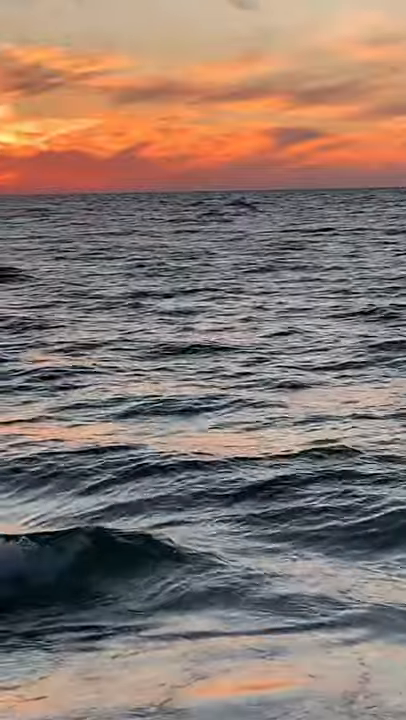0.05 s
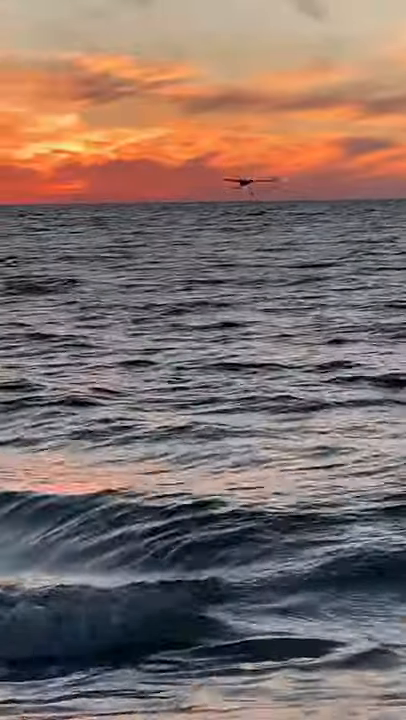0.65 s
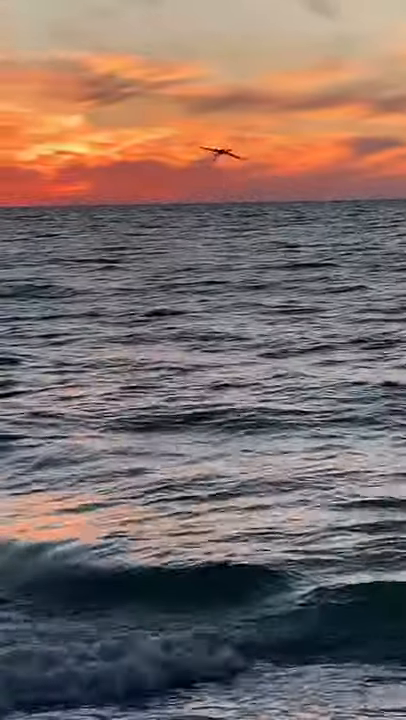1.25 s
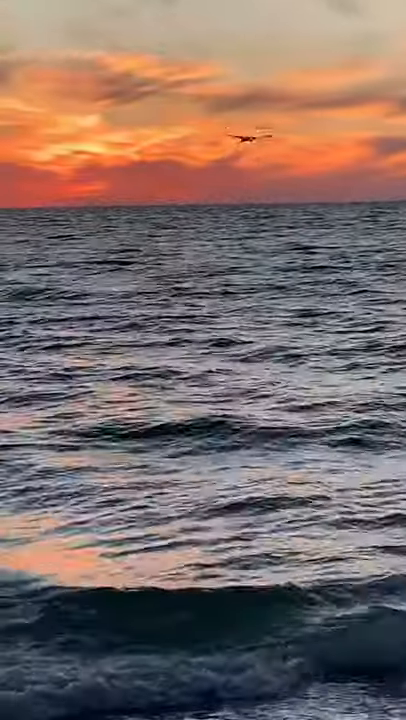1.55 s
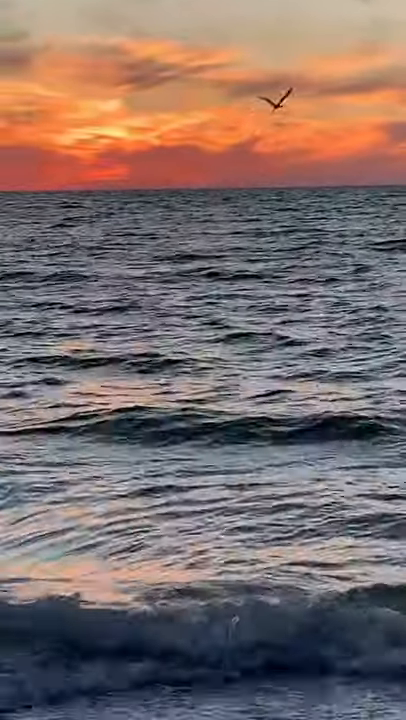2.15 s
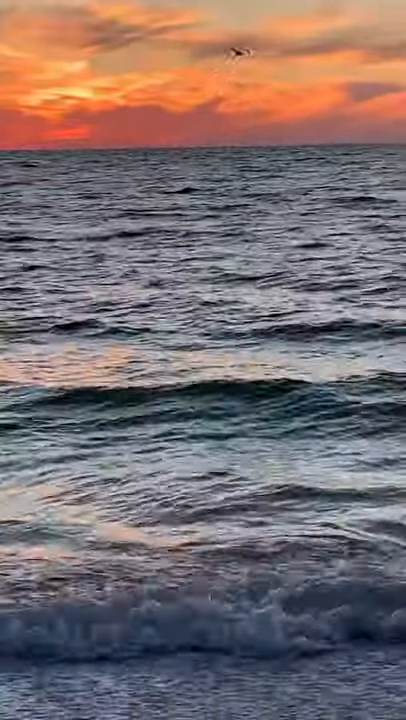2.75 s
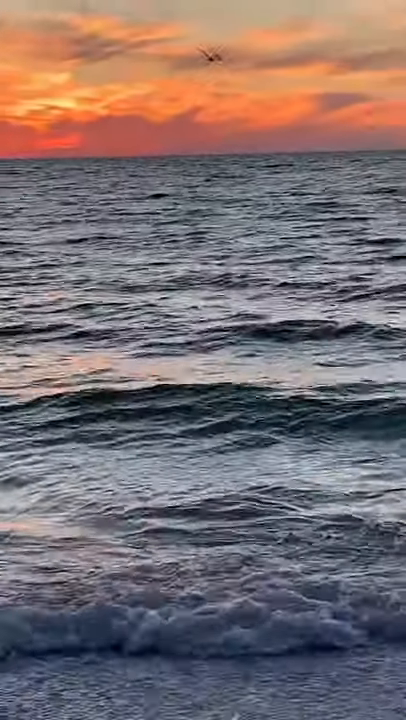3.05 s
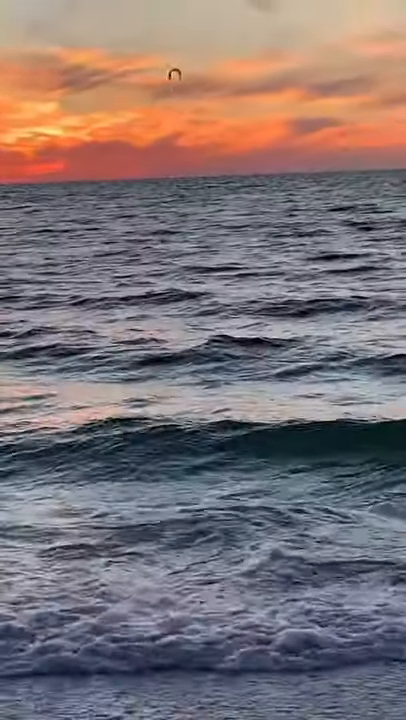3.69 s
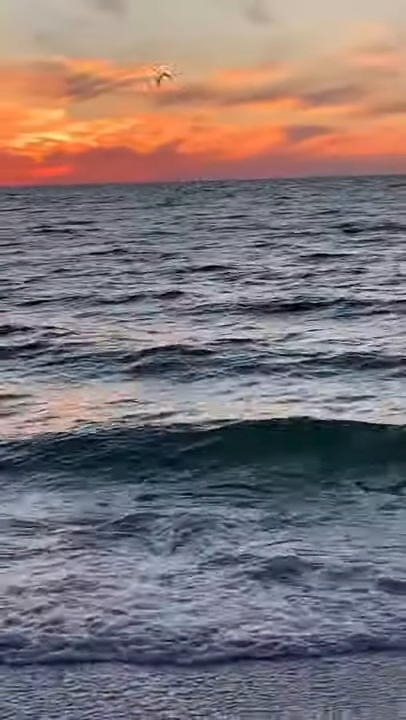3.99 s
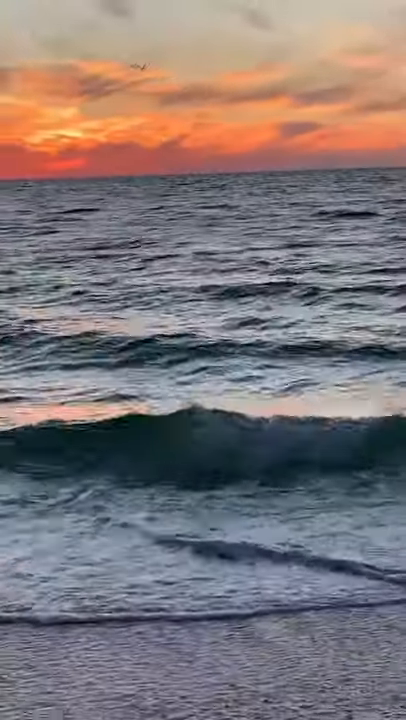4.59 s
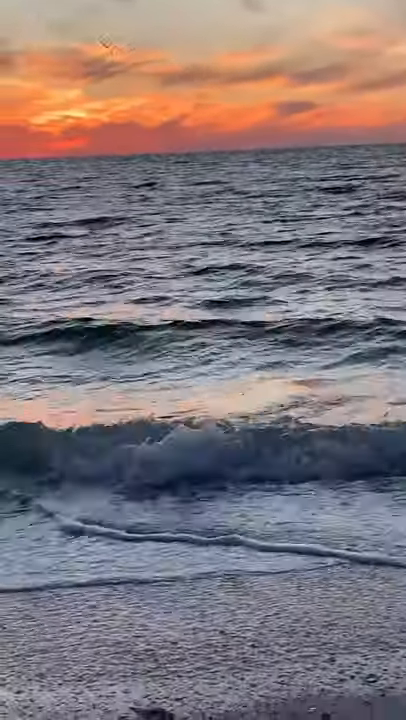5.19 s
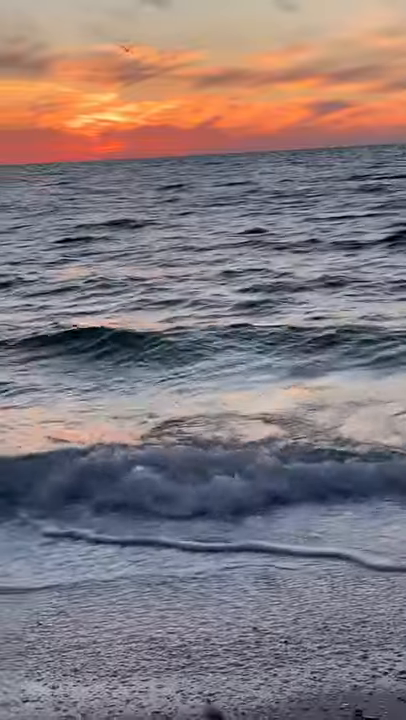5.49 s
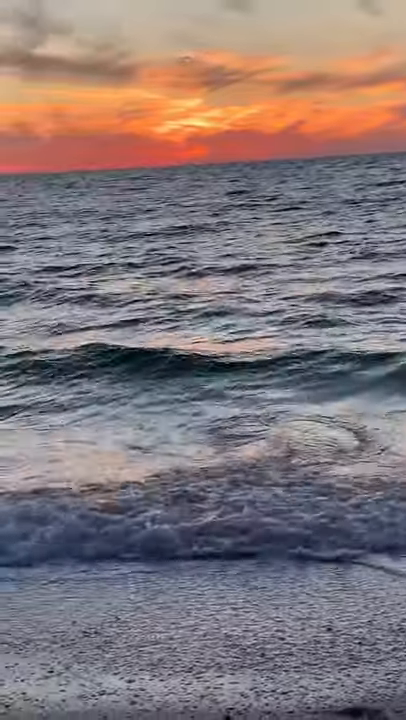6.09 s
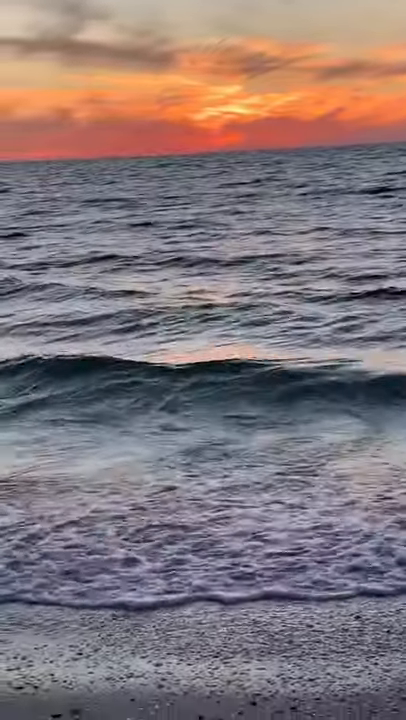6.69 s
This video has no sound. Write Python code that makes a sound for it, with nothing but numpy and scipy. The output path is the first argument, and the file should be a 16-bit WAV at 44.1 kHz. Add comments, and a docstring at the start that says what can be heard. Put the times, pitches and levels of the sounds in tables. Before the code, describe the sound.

Small waves break on a sandy beach, ahead and slightly to the left. Each one churns and roars as it spills, then its foam hisses up the sand. Close on the microphone, gusty wind rumbles and flutters throughout, with short puffs and low thumps. The surf swells twice, early and again near the end, while the wind is most blustery in the middle.

```python
"""Small surf on a windy beach

A hand-held camera on the sand, the sea ahead and to the left. Small waves break: each churns and
roars as it spills, then its foam hisses up the beach. Right at the two microphone ports, gusty wind
rumbles and flutters, with short brighter puffs, single thumps and wide cross gusts.
The bass is mono, up to a pitch that drifts."""
import sys
import numpy as np
from scipy import signal
from scipy.fft import rfft, irfft, next_fast_len
from scipy.io import wavfile
from scipy.ndimage import uniform_filter1d, map_coordinates

SR = 44100
rng = np.random.default_rng(int(sys.argv[2]) if len(sys.argv) > 2 else 0)


def put_to_file(sound):
    """Save the sound as 16-bit audio at rate SR, in the file named by the first command-line argument."""
    columns = np.atleast_2d(sound).T  # one column per channel
    safe = np.clip(columns, -1, 1)
    whole_steps = np.round(safe * 32767)
    wavfile.write(sys.argv[1], SR, whole_steps.astype(np.int16))


N = 301644

# The surf builds to two breakers and ebbs. Each row: time in seconds, roar in dB, relative spray in dB.
SURF_LEVELS = [(0, -37.5, -43), (.48, -40, -42.5), (.85, -39, -43), (1.25, -36.5, -42), (1.6, -32.5, -45),
               (2.1, -37, -39), (2.65, -39, -43.5), (3.25, -40.5, -49), (3.9, -37.5, -48), (4.12, -38, -47),
               (4.28, -40, -46), (4.6, -38, -47.5), (5.1, -37.5, -44.5), (5.33, -34.3, -44),
               (5.75, -36.5, -46), (6.1, -38, -56), (6.55, -42.5, -56), (6.84, -39.5, -54)]
# White water tumbling under the crest. Each row: time in seconds, level in dB.
TUMBLE_LEVELS = [(0, -36.5), (.4, -41.5), (.9, -33), (1.6, -30), (2.1, -32), (2.55, -36), (2.7, -39.5),
                 (2.85, -34), (3.3, -35.5), (3.8, -34.5), (4.0, -29.5), (4.8, -36), (5.1, -36.5),
                 (5.3, -34), (5.8, -32.5), (6.84, -51)]
# Sheets of foam spilling. Each row: start, length and rise in seconds, level in dB.
FOAM_SPILLS = [(-.1, 0.21, 0.15, -40.5), (0.575, 0.33, 0.15, -37), (1.023, 0.49, 0.15, -38),
               (1.416, 0.45, 0.094, -37), (1.847, 0.24, 0.16, -40.5), (2.797, 0.082, 0.07, -37.5),
               (3.52, 0.46, 0.16, -39), (4.02, 0.13, .06, -39), (5.09, 0.23, 0.18, -40),
               (5.41, 0.32, 0.095, -42.5), (6.293, 0.17, 0.099, -42.5)]
# Notes of air trapped by the breakers. Each row: start and length in seconds, pitch in Hz, level in dB.
HOLLOW_NOTES = [(-.3, 2.75, 827, -41), (-.3, 3, 1395, -44.5), (4.994, 0.8, 1160, -44)]
# The colours of the sea. Each row: frequency in Hz, relative density in dB.
CHURN_SPECTRUM = [(40, -35), (150, -5), (270, 0.5), (420, -2.5), (640, 2), (830, -3), (1000, -18.5),
                  (1500, -16.5), (3000, -44)]
ROAR_SPECTRUM = [(200, -48), (450, -22), (620, -7), (830, -4.5), (990, -3), (1200, 0), (1380, -3.5),
                 (1650, -5.5), (2050, -8.5), (2600, -14), (3800, -12), (9000, -56)]
FOAM_SPECTRUM = [(900, -3.5), (2000, 2.5), (2900, -1.5), (4500, -.5), (6300, .5), (7600, -2), (9000, -4),
                 (12000, -9), (15800, -17)]
SPRAY_SPECTRUM = [(3000, -19), (6000, -5), (8700, -1), (11000, -0.5), (13000, -4.5), (15800, -5)]
# How alike the sea is at the two ports. Each row: frequency in Hz, likeness (clipped to 0-0.995 in use).
SEA_LIKENESS = [(420, 0.5), (650, 0), (850, 0.5), (1000, 0.63), (1400, 0.7), (1850, 0.5), (2200, 0),
                (2750, 1), (3200, -5.5), (3900, 16)]
# The sea reaches the left port first. Each row: frequency in Hz, lead in radians.
LEFT_LEAD = [(250, 0), (340, 1.4), (420, 3), (520, 3.7), (680, 4.3), (830, 5.8), (1020, 5.4), (1250, 6.2),
             (1500, 6.3), (2000, 7.3), (2450, 9.1), (2900, 7.8), (3600, 8), (4650, 9.42), (6850, 12.57),
             (15200, 25.13)]
# The sea's balance between the ports. Each row: frequency in Hz, left minus right in dB.
SEA_BALANCE = [(300, -9), (700, -0.5), (1400, -0.5), (2000, -2.5), (3000, -0.5), (4500, 0)]

# The breeze between gusts. Each row: time in seconds, level in dB.
BREEZE_LEVELS = [(0, -37.5), (.3, -27), (.48, -30.5), (1.1, -27), (1.55, -29.5), (2.1, -27), (2.5, -30),
                 (2.75, -35), (2.95, -30), (3.8, -28), (4.1, -25), (4.65, -25), (5.03, -30.5), (5.5, -28.5),
                 (6.1, -30.5), (6.84, -30.5)]
# Gusts on the microphone. Each row: start and length in seconds, flutter in dB, rumble in dB.
WIND_GUSTS = [(0.084, 0.081, -23.5, -29), (0.266, 0.11, -30.5, -26), (0.637, 0.12, -25, -30),
              (0.87, 0.021, -27, -30), (0.943, 0.048, -25, -25), (1.13, 0.076, -27.5, -27),
              (1.311, 0.12, -20.5, -28), (1.64, 0.06, -16, -23), (1.862, 0.091, -18.5, -25),
              (1.99, 0.034, -24.5, -24), (2.096, 0.05, -29, -26), (2.269, 0.033, -45, -23),
              (2.505, 0.035, -27.5, -30), (2.796, 0.07, -29.5, -31), (2.835, 0.065, -21.5, -22),
              (2.91, 0.078, -31, -22), (3.008, 0.039, -19.5, -20), (3.098, 0.028, -19.5, -21),
              (3.146, 0.023, -28, -22), (3.243, 0.084, -26.5, -27), (3.34, 0.073, -26, -28),
              (3.466, 0.02, -28, -24), (3.59, 0.034, -19.5, -25), (3.65, 0.027, -37, -22),
              (3.684, 0.035, -23.5, -23), (3.855, 0.081, -22.5, -40), (4.017, 0.21, -24, -28),
              (4.244, 0.035, -27.5, -25), (4.305, .045, -22, -23), (4.378, 0.037, -22, -27),
              (4.5, 0.1, -31, -34), (4.718, 0.055, -33, -20), (4.843, 0.084, -24.5, -24.5),
              (5.174, 0.12, -26, -29), (5.35, 0.12, -25.5, -29), (5.489, 0.22, -25.5, -26),
              (5.806, 0.19, -26.5, -24.5), (6.191, 0.056, -20.5, -24), (6.281, 0.056, -19.5, -22),
              (6.401, 0.088, -23.5, -26), (6.513, 0.066, -19.5, -22), (6.594, 0.05, -23.5, -22),
              (6.754, 0.063, -23.5, -32)]
# Sharp puffs. Each row: time of the peak in seconds, relative level in dB, decay in seconds.
WIND_PUFFS = [(0.329, -12.5, 0.025), (1.367, -7, 0.015), (1.397, -8, 0.013), (1.69, -7.5, 0.009),
              (1.93, -23, .014), (2.303, -17, 0.0066), (2.87, -6, 0.011), (3.168, -11, 0.011),
              (3.621, -7, 0.011), (3.714, -9.5, 0.012), (4.05, -11, .01), (4.116, -10, 0.0081),
              (4.204, -10, .012), (4.42, -13, 0.011), (6.525, -18, .014), (6.627, -20, 0.008),
              (6.647, -10, 0.0082)]
# Single eddies striking both ports. Each row: time in seconds, envelope peak in dB, pitch in Hz.
EDDY_KNOCKS = [(.425, -18, 90), (.712, -14.5, 72), (.893, -12.5, 99), (1.149, -16.5, 78), (1.396, -13, 674),
               (1.693, -11, 700), (1.704, -17, 152), (1.826, -9, 82.6), (1.937, -11, 123),
               (2.115, -15.5, 68), (2.2, -18, 62), (2.303, -17, 780), (2.871, -14, 760), (2.886, -7, 170),
               (2.975, -12.5, 67.6), (3.127, -13, 126), (3.176, -11, 100), (3.367, -11, 121),
               (3.623, -13.5, 780), (3.648, -11, 72), (3.701, -15, 80), (4.119, -9.5, 165),
               (4.335, -10.5, 85), (4.405, -11, 133), (4.897, -10, 100), (5.201, -15, 68), (5.47, -15, 68),
               (6.249, -10, 78), (6.657, -12.5, 76)]
# Gusts across the ports. Each row: start and length in seconds, relative thump and tear levels in dB.
CROSS_GUSTS = [(2.85, 0.04, -18.5, -32), (2.897, 0.066, -17.5, -28), (3.008, 0.058, -17.5, -33),
               (3.11, .06, -30, -31), (3.246, 0.2, -29, -40), (3.628, .02, -14.5, -22),
               (3.658, 0.067, -20.5, -27), (3.88, 0.26, -30, -35), (4.184, 0.022, -26, -24),
               (4.246, 0.11, -27, -31), (4.402, 0.041, -26, -28), (4.503, 0.18, -28, -40)]
# The colours of the wind. Each row: frequency in Hz, relative density in dB.
RUMBLE_SPECTRUM = [(10, -40), (25, -30), (40, -6.5), (56, 0), (105, 1), (150, -3.5), (220, -15),
                   (400, -16.5), (900, -86)]
FLUTTER_SPECTRUM = [(50, -33), (120, -3), (180, 2.5), (260, 1.5), (350, -5), (480, -7.5), (700, -21),
                    (1100, -29.5), (2200, -50), (5000, -122)]
PUFF_SPECTRUM = [(50, 4), (150, 9), (300, 7.5), (600, 3.5), (1000, -3), (1600, -31), (3000, -45),
                 (6000, -74)]
THUMP_SPECTRUM = [(150, -21), (270, -5), (325, -2.5), (420, -12), (600, -24), (1500, -70)]
TEAR_SPECTRUM = [(250, -16), (450, 2), (650, -9), (950, -6), (1400, -18), (2200, -20), (5000, -70)]
# The camera's mono bass. Each row: time in seconds, frequency in Hz below which the channels merge.
MONO_BELOW = [(0, 806), (1.25, 790), (1.65, 496), (2.1, 423), (2.5, 290), (4.8, 284), (5.4, 424),
              (6.84, 450)]

TOP_HZ = 15800  # the camera's band limit


def amp(db):
    """Decibels to gain."""
    return 10 ** (np.asarray(db) / 20)


def unit(x):
    """x at rms 1."""
    return x / np.sqrt(np.mean(x ** 2) + 1e-20)


def along(points, hz):
    """(Hz, value) points read on a log axis."""
    f, v = np.transpose(points)
    return np.interp(np.log(hz + 1), np.log(f + 1), v)


def curves(rows):
    """One value per sample for each column after the time."""
    s, *cols = np.transpose(rows)
    return [np.interp(np.arange(N) / SR, s, c) for c in cols]


def wobble(rate):
    """A smooth random curve, rate knots a second."""
    return map_coordinates(rng.standard_normal(int(N * rate / SR) + 4), [np.arange(N) * rate / SR])


def swell(start, length, attack, release):
    """An envelope that rises smoothly and dies away once its length is over; times in seconds."""
    t = np.arange(N) / SR - start
    rise = np.sin(np.pi / 2 * np.clip(t / attack, 0, 1)) ** 2
    return rise * np.exp(-np.clip((t - length) / release, 0, 20))


def filtered(x, response):
    """x times a complex response of frequency."""
    m = next_fast_len(N + 8192)
    return irfft(rfft(x, m) * response(np.fft.rfftfreq(m, 1 / SR)), m)[..., :N]


def patchy(depth_db):
    """Two unrelated noises sharing patches of random gain in time and frequency."""
    noise = signal.stft(rng.standard_normal((2, N)), nperseg=512)[2]
    patches = uniform_filter1d(rng.standard_normal(noise.shape[1:]), size=5, axis=0)
    patches = uniform_filter1d(patches, size=12, axis=1)
    return signal.istft(noise * amp(depth_db * unit(patches)), nperseg=512)[1][:, :N]


def from_sea(pair, spectrum):
    """Colour two noises and place them wide, ahead and to the left of the microphone, at rms 1."""
    def blend(hz):
        angle = np.arccos(np.clip(along(SEA_LIKENESS, hz), 0, .995)) / 2
        return amp(along(spectrum, hz)) * [np.cos(angle), np.sin(angle)]

    def ports(hz):
        half = np.array([[.5], [-.5]])
        lead = np.interp(hz, *np.transpose(LEFT_LEAD))
        return amp(half * along(SEA_BALANCE, hz)) * np.exp(1j * half * lead)

    common, apart = filtered(pair, blend)
    return unit(filtered(np.array([common + apart, common - apart]), ports))


def bubbles(count, centre_hz, spread, cycles, scatter_db):
    """Two streams of tiny damped rings: bubbles of many sizes, a few much louder than the rest."""
    when, stream = rng.random((count, 2)).T
    hz = np.clip(centre_hz * np.exp(spread * rng.standard_normal((count, 1))), 200, TOP_HZ)
    strength = amp(scatter_db * np.minimum(rng.exponential(size=(count, 1)), 5))
    age = np.arange(400)  # samples
    turns = hz * age / SR
    rings = strength * np.sin(2 * np.pi * turns) * np.exp(-turns * np.pi / cycles)
    start = (when * (N - len(age))).astype(int) + N * (stream > .5)
    return unit(np.bincount((start[:, None] + age).ravel(), rings.ravel(), 2 * N).reshape(2, N))


def churn():
    """The mass of white water tumbles under the crest: a low, patchy noise."""
    tumble_db, = curves(TUMBLE_LEVELS)
    return amp(tumble_db + 1.2 * wobble(20)) * from_sea(patchy(depth_db=5), CHURN_SPECTRUM)


def roar(roar_db, spill):
    """Clouds of large bubbles roar in the crest, louder with each spill."""
    gurgle = bubbles(count=1800, centre_hz=1227, spread=0.442, cycles=22, scatter_db=1.5)
    level = np.hypot(amp(roar_db), amp(-6.5) * spill) * amp(0.57 * wobble(22))
    return level * from_sea(patchy(depth_db=1.5) + amp(-15.5) * gurgle, ROAR_SPECTRUM)


def foam(roar_db, spill):
    """Bursting foam hisses up the sand with each spill; what lingers rises and falls with the roar."""
    fizz = bubbles(count=9000, centre_hz=5670, spread=0.656, cycles=2.8, scatter_db=2)
    lingering = amp(-42 + 0.81 * (roar_db - roar_db.mean()))
    level = np.hypot(lingering, spill) * amp(0.97 * wobble(30))
    return level * from_sea(patchy(depth_db=2) + amp(-12) * fizz, FOAM_SPECTRUM)


def spray(spray_db):
    """Fine droplets hiss above the foam."""
    droplets = bubbles(count=5000, centre_hz=10000, spread=.25, cycles=7, scatter_db=2.5)
    level = amp(spray_db - 0.5 + 0.51 * wobble(45))
    return level * from_sea(patchy(depth_db=3) + amp(-12) * droplets, SPRAY_SPECTRUM)


def hollow(width_hz=230, drift=.02):
    """A cloud of trapped air pulses as a whole: a narrow band of noise at its wandering resonance."""
    notes = np.zeros(N)
    for start, length, hz, db in HOLLOW_NOTES:
        band = wobble(width_hz) + 1j * wobble(width_hz)
        turns = np.cumsum(hz * (1 + drift * wobble(6))) / SR  # the cloud changes size
        note = unit(np.real(band * np.exp(2j * np.pi * turns)))
        notes += amp(db) * swell(start, length, attack=0.33, release=0.43) * note
    return notes


def breakers():
    """Waves break out in front of the microphone; each spill lifts both roar and foam."""
    roar_db, spray_db = curves(SURF_LEVELS)
    spill = np.sqrt(sum((amp(db) * swell(start, length, rise, release=0.11)) ** 2
                        for start, length, rise, db in FOAM_SPILLS))
    return churn() + roar(roar_db, spill) + foam(roar_db, spill) + spray(spray_db) + hollow()


def turbulence(spectrum, steady_s):
    """Two unrelated wind pressures, their swells slower than steady_s evened out."""
    pressure = unit(filtered(rng.standard_normal((2, N)), lambda hz: amp(along(spectrum, hz))))
    power = uniform_filter1d(pressure ** 2, size=int(steady_s * SR), axis=1)
    return pressure / np.sqrt(np.abs(power) + 1e-6)


def on_ports(pair, apart_db=-3.5):
    """One turbulence shared by both ports and a weaker one that differs, at rms 1."""
    common, apart = pair[0], amp(apart_db) * pair[1]
    return unit(np.array([common + apart, common - apart]))


def gusting(swing_db=1.5, extra_rumble_db=1.5):
    """Strength of flutter and rumble: gusts ride on a wandering breeze."""
    breeze_db, = curves(BREEZE_LEVELS)
    power = amp(breeze_db + swing_db * wobble(17) + np.array([[0], [extra_rumble_db]])) ** 2
    for start, length, flutter_db, rumble_db in WIND_GUSTS:
        gust = swell(start, length, attack=0.018, release=0.031)
        power += (amp([[flutter_db], [rumble_db]]) * gust) ** 2
    return np.sqrt(power)


def wind():
    """Large eddies rumble on both ports at once and small ones flutter, in quick uneven lumps."""
    flutter_gain, rumble_gain = gusting()
    lumps = wobble(45)
    rumble = turbulence(RUMBLE_SPECTRUM, steady_s=0.071)[0] * unit(amp(0.74 * lumps))
    eddies = turbulence(FLUTTER_SPECTRUM, steady_s=0.037)
    slow_eddies = filtered(eddies, lambda hz: 1 / (1 + (hz / 340) ** 8))
    # Faster air sheds smaller eddies: the flutter brightens.
    speed = np.clip((20 * np.log10(flutter_gain) + 36) / 12, 0, 1.05)
    flutter = slow_eddies + speed * (eddies - slow_eddies)
    flutter *= unit(amp(1.6 * lumps + 2 * wobble(110)))
    return rumble_gain * rumble + flutter_gain * on_ports(flutter)


def puffs(rise_s=0.0069):
    """A fast eddy hits the ports squarely: a short ragged burst that reaches higher than the flutter."""
    t = np.arange(N) / SR
    force = sum(amp(db) * np.exp(-np.maximum((peak_s - t) / rise_s, (t - peak_s) / decay_s))
                for peak_s, db, decay_s in WIND_PUFFS)
    ragged = amp(-13 + 2.4 * wobble(160))
    return ragged * force * on_ports(turbulence(PUFF_SPECTRUM, steady_s=0.015))


def knocks(half_width_cycles=0.61):
    """An eddy passing over the ports pushes and pulls once or twice: big ones thump, small ones slap."""
    t = np.arange(N) / SR
    pressure = np.zeros(N)
    for (peak_s, db, hz), phase in zip(EDDY_KNOCKS, rng.random(len(EDDY_KNOCKS))):
        near = np.abs(t - peak_s) < .05
        turns = (t[near] - peak_s) * hz
        envelope = amp(db) * np.exp(-(turns / half_width_cycles) ** 2)
        pressure[near] += envelope * np.sin(2 * np.pi * (turns + phase))
    return pressure


def cross_gusts():
    """Air sweeping across the camera pushes on one port and pulls on the other: a wide bluster."""
    shapes = np.array([swell(start, length, attack=0.014, release=0.014)
                       for start, length, _, _ in CROSS_GUSTS])
    thump_gain, tear_gain = amp(np.transpose(CROSS_GUSTS)[2:]) @ shapes
    thump = thump_gain * turbulence(THUMP_SPECTRUM, steady_s=0.076)[0]
    tear = tear_gain * turbulence(TEAR_SPECTRUM, steady_s=0.011)[0]
    push = (thump + tear) * unit(amp(2.9 * wobble(120))) * amp(-4.5)
    return np.array([push, -push])


def wind_duck(hz, mid, side, onset_db=4, depth_db=-14, above_hz=400):
    """Wind suppressor gain: the shared midrange dips while the ports differ much more than they agree."""
    band = (hz > 450) & (hz < 1600)
    power = lambda z: np.abs(uniform_filter1d(np.mean(np.abs(z[band]) ** 2, axis=0), size=3)) + 1e-14
    windy = 1 / (1 + (amp(onset_db) ** 2 * power(mid) / power(side)) ** 3)
    reach = 1 / (1 + (above_hz / (hz + 1)) ** 8) / (1 + (hz / 1500) ** 6)
    return amp(depth_db * reach[:, None] * windy)


def scene():
    """The surf down the beach, behind the wind on the microphone."""
    return breakers() + wind() + puffs() + knocks() + cross_gusts()


def record(dry):
    """The camera ducks the midrange in cross wind, folds the bass to mono and cuts the highest treble."""
    hz, t, (left, right) = signal.stft(dry, SR, nperseg=1024)
    mono_hz = np.interp(t, *np.transpose(MONO_BELOW))
    width = np.arctan((hz[:, None] / mono_hz) ** 12)  # 0 is mono, pi/2 full stereo
    mid, side = (left + right) / 2, (left - right) / 2
    folded = 1j * np.cos(width) * side  # a quarter cycle round, so the fold loses no power
    mid = wind_duck(hz, mid, side) * mid + folded
    side = np.sin(width) * side
    pair = signal.istft(np.array([mid + side, mid - side]), SR, nperseg=1024)[1][:, :N]
    return filtered(pair, lambda hz: hz < TOP_HZ)


dry = scene()
out = record(dry)
put_to_file(out)
```